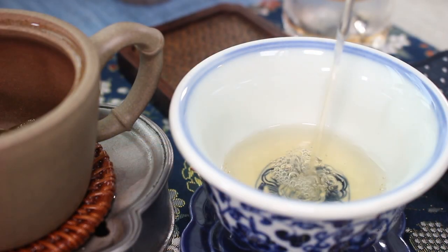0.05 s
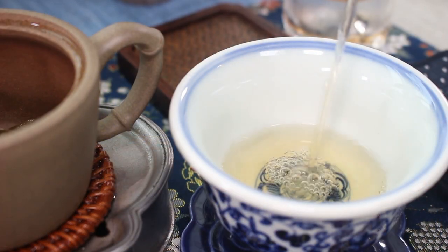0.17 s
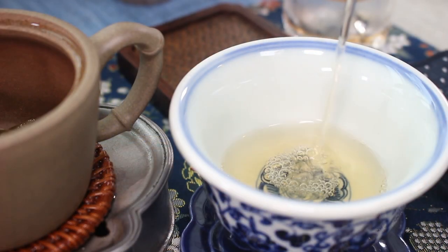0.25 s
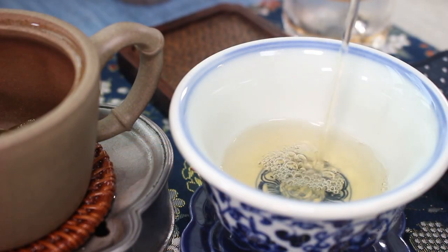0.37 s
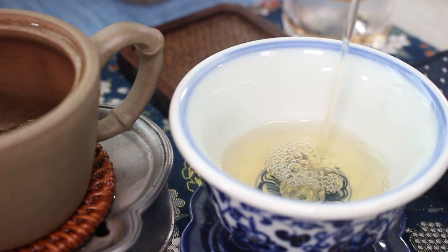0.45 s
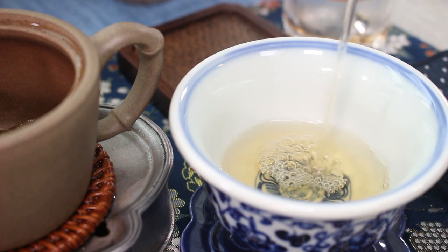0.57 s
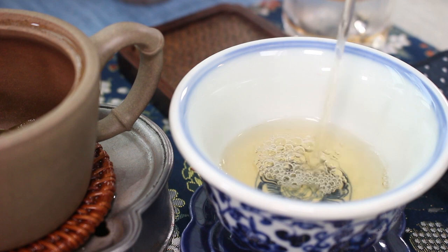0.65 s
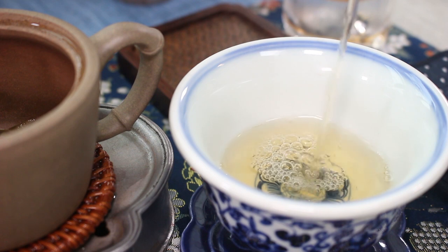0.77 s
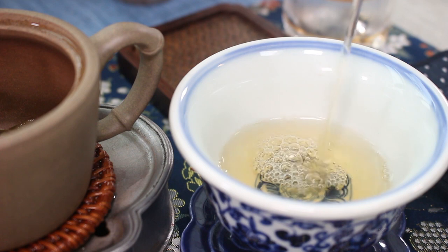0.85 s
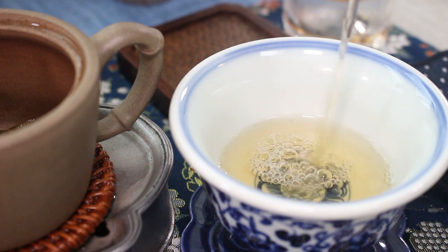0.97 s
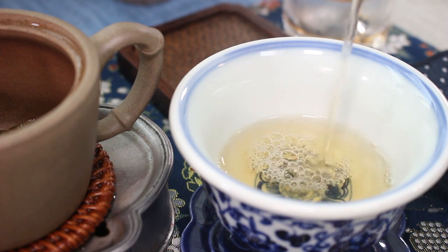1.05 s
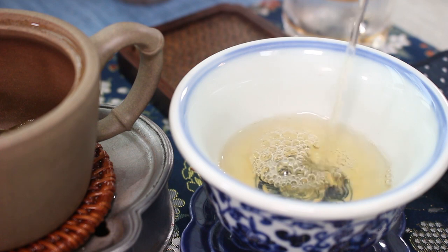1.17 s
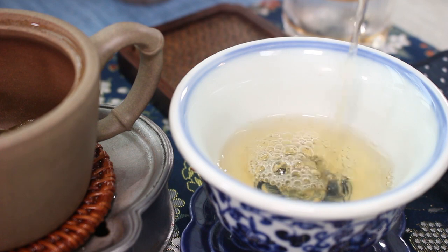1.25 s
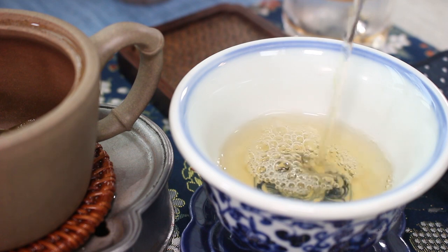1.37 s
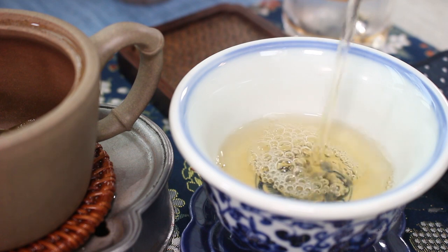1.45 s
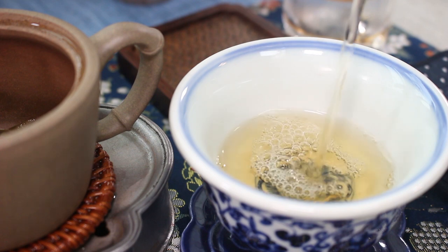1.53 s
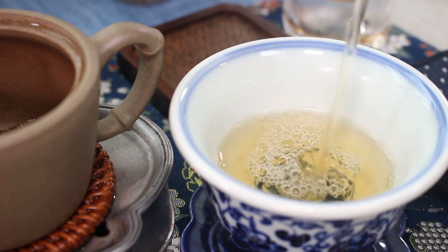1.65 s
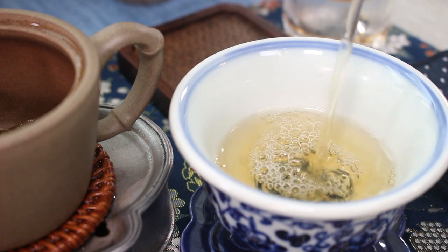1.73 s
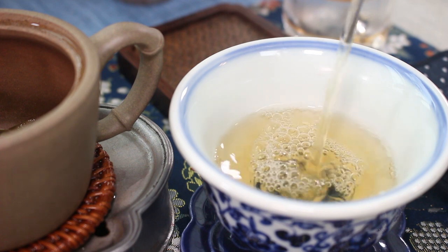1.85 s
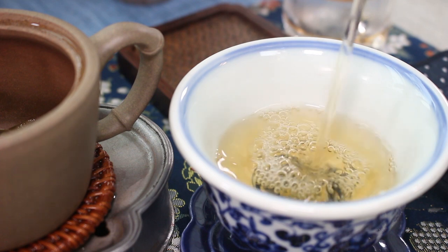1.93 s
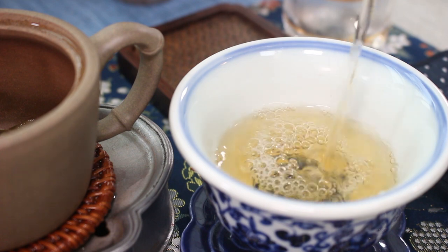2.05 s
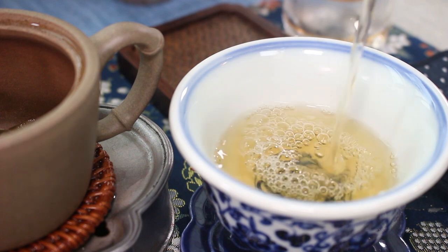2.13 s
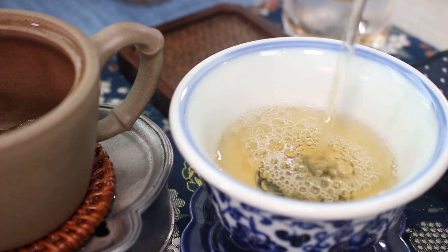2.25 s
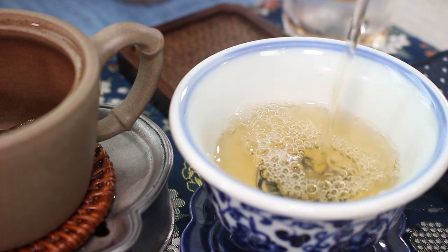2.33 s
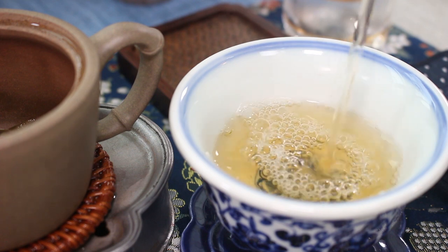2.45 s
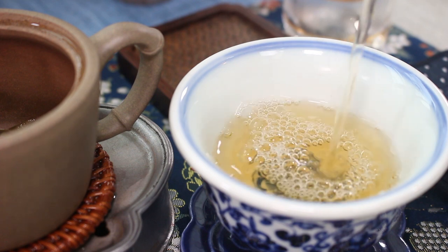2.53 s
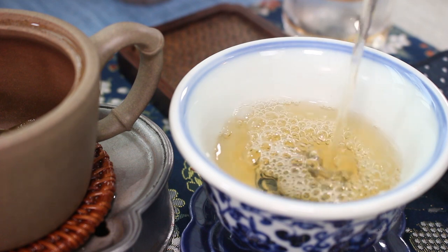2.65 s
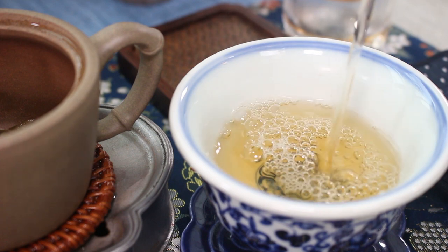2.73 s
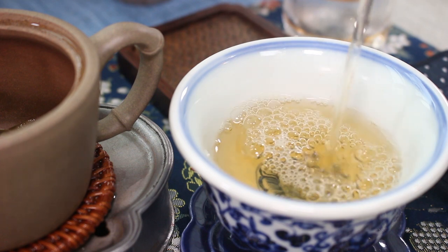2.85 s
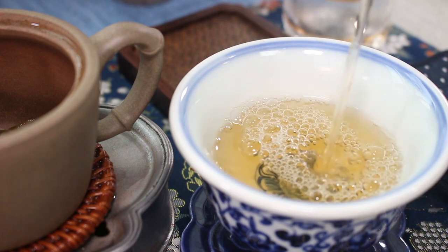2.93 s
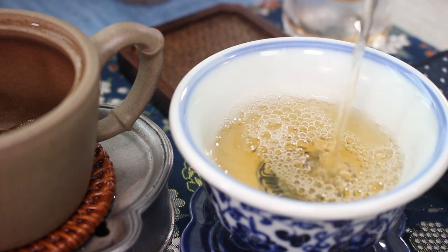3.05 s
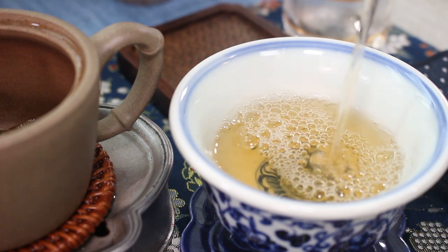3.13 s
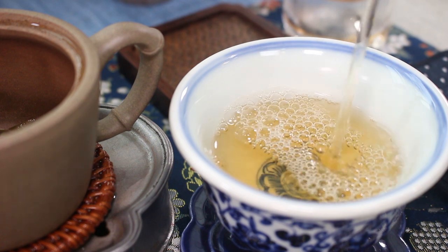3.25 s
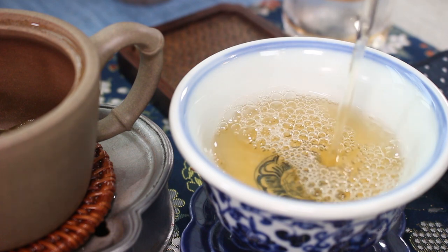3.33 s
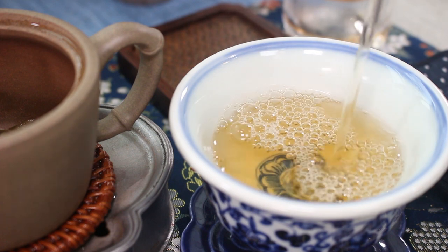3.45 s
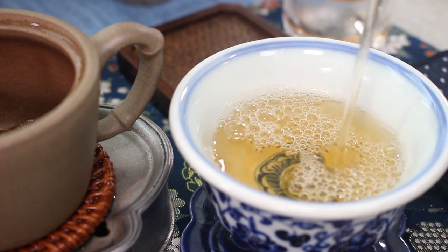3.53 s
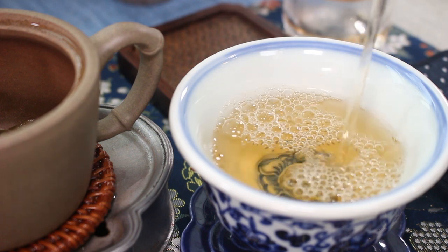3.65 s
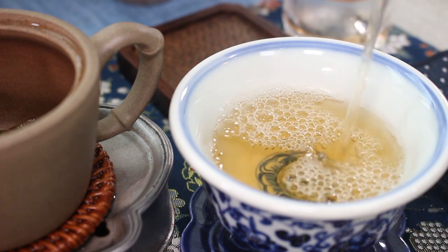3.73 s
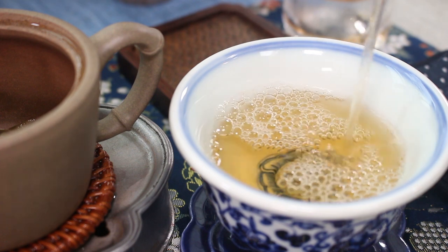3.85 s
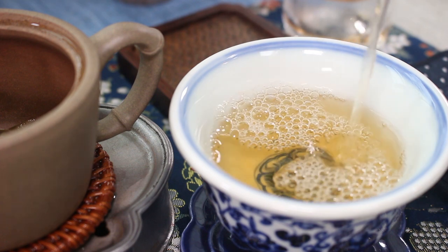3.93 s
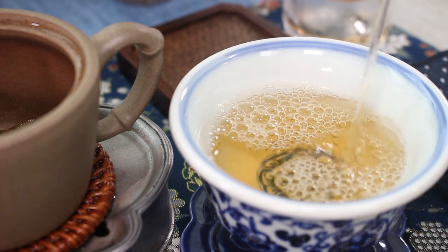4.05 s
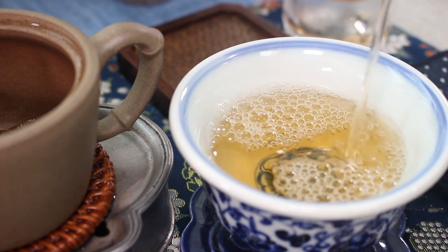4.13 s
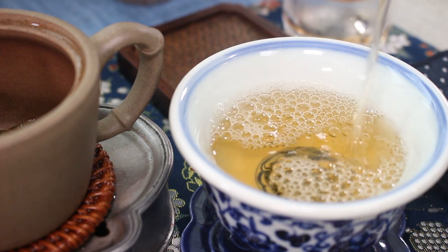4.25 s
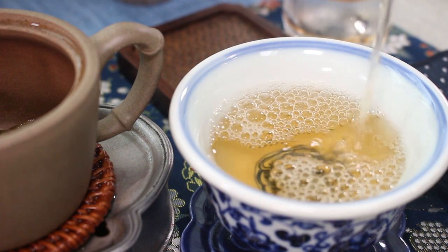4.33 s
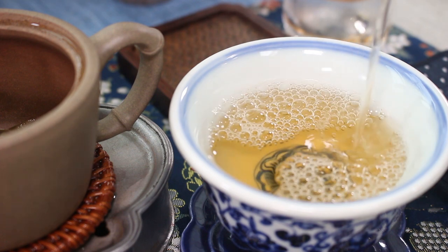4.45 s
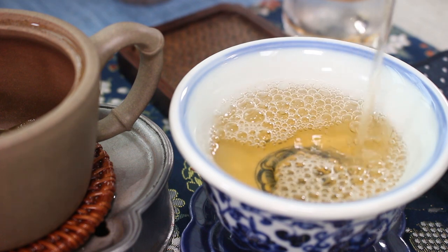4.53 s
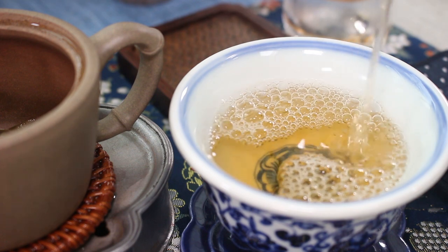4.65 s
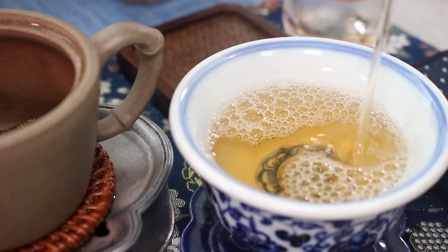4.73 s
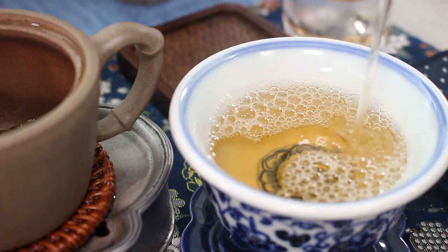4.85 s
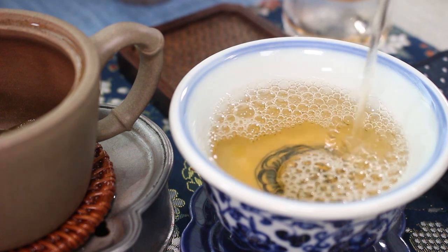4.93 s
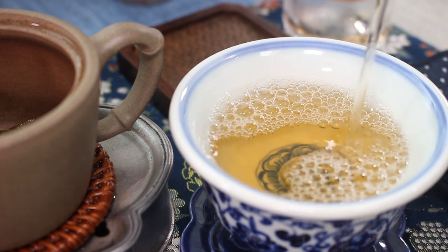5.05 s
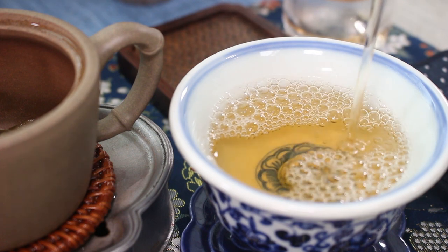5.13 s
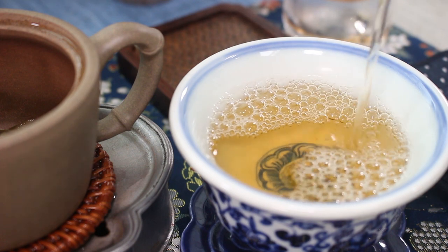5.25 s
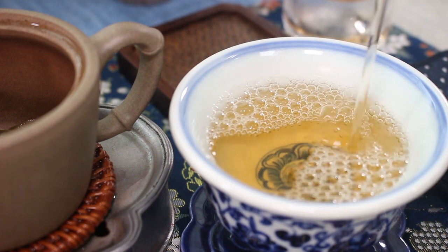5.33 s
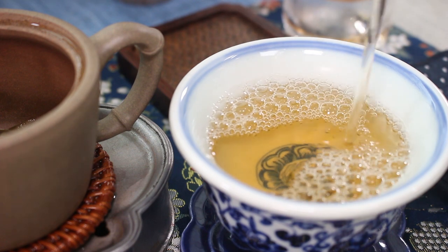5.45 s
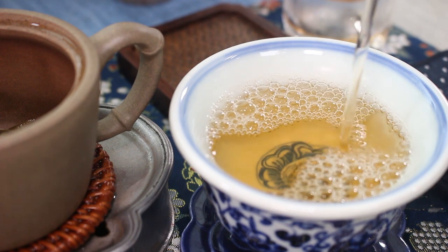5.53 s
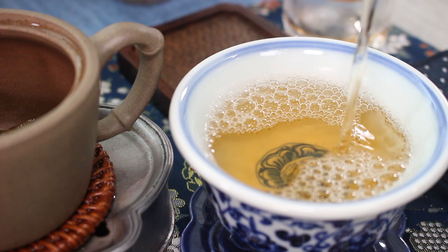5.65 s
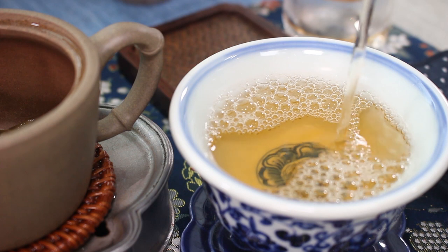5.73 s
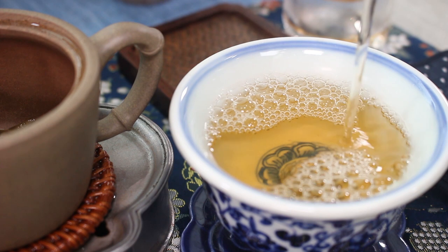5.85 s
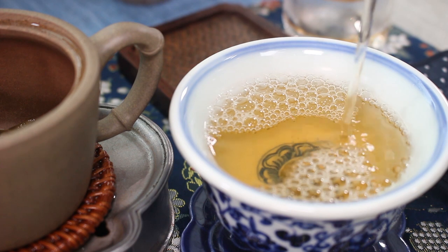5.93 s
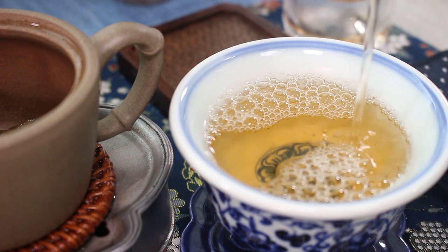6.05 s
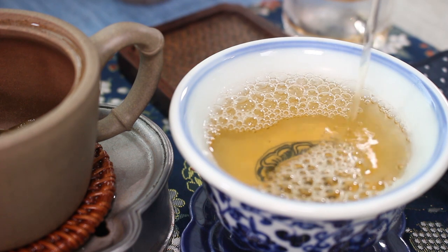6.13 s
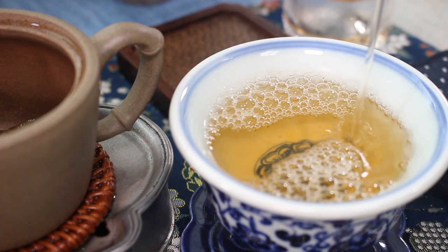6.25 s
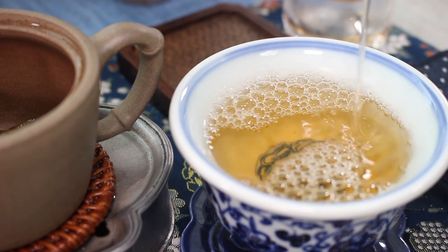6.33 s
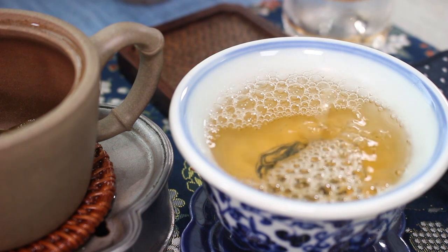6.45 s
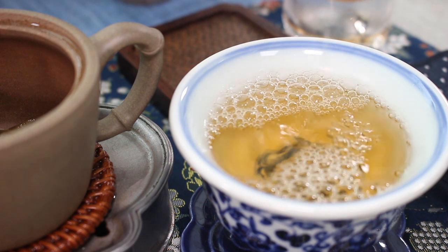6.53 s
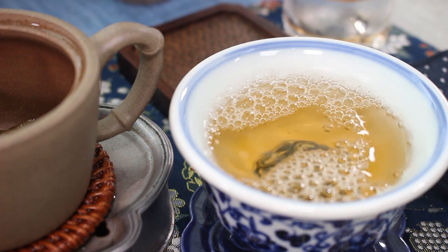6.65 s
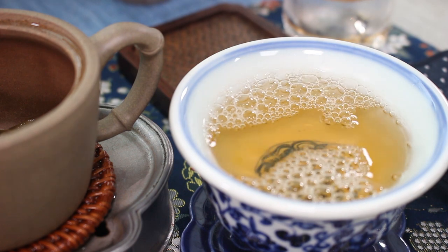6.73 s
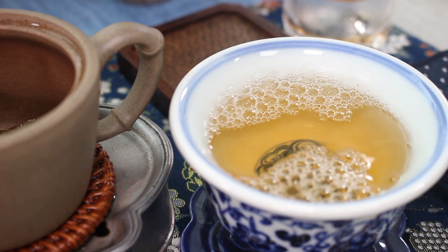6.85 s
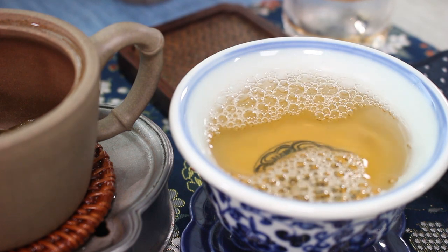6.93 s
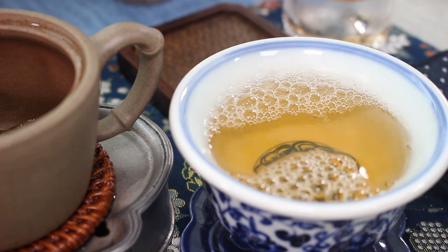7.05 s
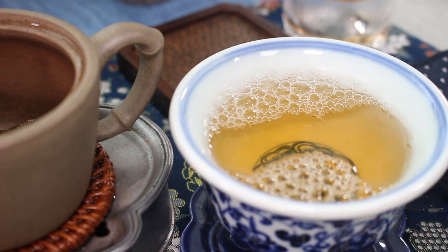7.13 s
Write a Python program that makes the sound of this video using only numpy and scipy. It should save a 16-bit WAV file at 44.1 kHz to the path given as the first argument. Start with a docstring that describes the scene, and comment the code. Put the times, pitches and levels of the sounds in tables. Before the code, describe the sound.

A thin stream of tea pours into a ceramic cup, bubbling and plopping brightly, then thins to a trickle and a few last drips.

```python
"""Tea poured into a cup

A thin stream of tea falls into a ceramic cup on a table, close to a pair of microphone ports.
Each slug of liquid snaps the surface and traps a bubble that rings and rises in pitch. The foam
fizzes, the cup and the table ring briefly, and the stream ends in drips over a quiet room."""
import sys
import numpy as np
from scipy import signal
from scipy.fft import rfft, irfft, next_fast_len
from scipy.io import wavfile
from scipy.ndimage import uniform_filter1d

SR = 44100
rng = np.random.default_rng(int(sys.argv[2]) if len(sys.argv) > 2 else 0)


def put_to_file(sound):
    """Save the sound as 16-bit audio at rate SR, in the file named by the first command-line argument."""
    columns = np.atleast_2d(sound).T  # one column per channel
    safe = np.clip(columns, -1, 1)
    whole_steps = np.round(safe * 32767)
    wavfile.write(sys.argv[1], SR, whole_steps.astype(np.int16))


N = 316638

# single bubbles that stand out of the pour: start_s, level_db, pitch_hz
CLEAR_PLOPS = [(0.0487, -5, 1417), (0.1573, -15.5, 1690), (0.181, -8, 4450), (0.1808, -13.5, 1580),
               (0.186, -11.5, 1550), (0.2041, -17, 1360), (0.215, -5, 1624), (0.3057, -15.5, 1700),
               (0.3532, -10.5, 1700), (0.3589, -9, 1590), (0.3701, -12.5, 1460), (0.5369, -12, 1580),
               (0.54, -14, 1390), (0.5521, -6, 1760), (0.5912, -15, 1270), (0.604, -13.5, 1355),
               (0.625, -10, 4800), (0.6463, -13.5, 1400), (0.669, -4, 3670), (0.7863, -19, 4670),
               (0.7865, -15.5, 2110), (0.8236, -14.5, 1430), (0.8487, -10, 1570), (0.88, -18.5, 3980),
               (0.9175, -17.5, 4120), (0.9372, -20, 1900), (0.952, -11, 1425), (0.9604, -18, 1380),
               (0.992, -17.5, 4770), (1.0058, -14, 1890), (1.026, -13.5, 4760), (1.0563, -17.5, 3760),
               (1.1082, -20, 1410), (1.1293, -21.5, 4270), (1.1302, -16.5, 1700), (1.1542, -14, 4460),
               (1.1762, -20.5, 1360), (1.202, -19.5, 1340), (1.226, -13.5, 1420), (1.3137, -8, 4720),
               (1.3289, -16, 3780), (1.3374, -10.5, 3780), (1.434, -23.5, 1300), (1.5245, -14, 1400),
               (1.5371, -13, 1630), (1.5491, -21.5, 1990), (1.59, -17, 1610), (1.6317, -19, 1410),
               (1.72, -15, 1690), (1.7324, -19, 1380), (1.744, -8.5, 2580), (1.7417, -13.5, 1470),
               (1.762, -20.5, 1470), (1.7845, -16, 1440), (1.902, -21, 2150), (1.911, -20, 1430),
               (1.9179, -17, 1470), (1.939, -22, 1340), (1.9466, -18, 1280), (1.963, -21, 1440),
               (2.0558, -23.5, 1610), (2.118, -13, 1900), (2.1239, -10, 1390), (2.1935, -20, 4700),
               (2.2143, -18, 1320), (2.226, -15, 1290), (2.2273, -11, 3440), (2.2421, -15.5, 2680),
               (2.2619, -10.5, 3900), (2.2836, -12.5, 1230), (2.2974, -17, 2880), (2.3907, -11, 1510),
               (2.4817, -14.5, 1980), (2.5239, -8.5, 3720), (2.5606, -12, 2820), (2.702, -20.5, 4870),
               (2.7281, -16, 1300), (2.7463, -17.5, 3900), (2.809, -19.5, 1650), (2.824, -17, 2920),
               (2.8523, -11.5, 2920), (2.9237, -19.5, 2880), (2.995, -25.5, 1410), (3.0001, -20.5, 2160),
               (3.0005, -14, 3680), (3.0217, -15, 1640), (3.0365, -20, 1390), (3.0412, -16, 2840),
               (3.0435, -18.5, 1400), (3.093, -19.5, 1950), (3.0936, -12.5, 4860), (3.1066, -16.5, 2080),
               (3.1286, -16.5, 4860), (3.1322, -18.5, 2770), (3.1531, -8.5, 2900), (3.2052, -12, 2800),
               (3.222, -11.5, 2800), (3.2453, -15, 2340), (3.276, -21, 1660), (3.3353, -20.5, 4840),
               (3.421, -18.5, 2670), (3.4279, -15, 2020), (3.5459, -16.5, 2860), (3.5759, -19, 2160),
               (3.6063, -17, 2030), (3.6955, -17.5, 5200), (3.7376, -38, 2030), (3.764, -23.5, 2770),
               (3.7772, -25, 2650), (3.822, -19, 1970), (3.8683, -23, 2130), (3.8982, -17, 1960),
               (3.9074, -16.5, 1970), (3.9182, -16.5, 2000), (3.924, -19.5, 2700), (3.9554, -14, 3280),
               (3.9863, -13.5, 1910), (4.0399, -6, 3120), (4.1805, -17, 1770), (4.1936, -14.5, 4040),
               (4.1993, -20, 1750), (4.206, -14, 2680), (4.2485, -25.5, 2820), (4.3397, -6, 3730),
               (4.3704, -24.5, 1390), (4.4242, -16, 3250), (4.4348, -20.5, 1950), (4.453, -23.5, 1440),
               (4.467, -15, 1420), (4.4862, -19, 2840), (4.5226, -18.5, 4950), (4.6007, -19, 2070),
               (4.628, -22, 3350), (4.6354, -18, 2900), (4.6494, -17.5, 1460), (4.67, -21, 1570),
               (4.6838, -18.5, 1720), (4.6904, -20, 1740), (4.7014, -18.5, 2100), (4.7205, -12.5, 2780),
               (4.7486, -13, 4270), (4.7652, -19, 1980), (4.8015, -19.5, 2210), (4.8189, -21.5, 1440),
               (4.9098, -21, 2560), (5.0038, -22.5, 2080), (5.0424, -15, 4440), (5.0707, -9, 3000),
               (5.095, -19, 1470), (5.12, -19, 3280), (5.1694, -22, 2900), (5.2002, -21, 2900),
               (5.219, -16, 4150), (5.2751, -22.5, 2220), (5.306, -25, 2300), (5.3168, -23, 2820),
               (5.322, -33, 3000), (5.329, -27, 1660), (5.343, -34, 1600), (5.3535, -25, 2220),
               (5.4164, -31, 1800), (5.417, -21.5, 3080), (5.4517, -24, 3270), (5.458, -26.5, 3310),
               (5.4948, -41, 1680), (5.5123, -33.5, 1670), (5.6226, -40, 2700), (5.649, -36.5, 2780),
               (5.722, -28, 2960), (5.766, -32, 2970), (5.8084, -33.5, 2140), (5.8434, -32.5, 2730),
               (5.8961, -25, 2610), (5.9942, -35, 2360), (6.0238, -36.5, 2210), (6.1133, -24.5, 2650),
               (6.135, -25, 1700), (6.1353, -28.5, 3100), (6.1978, -26, 3920), (6.2812, -25, 1460),
               (6.31, -13, 3150), (6.3185, -25.5, 1700), (6.377, -28, 1650), (6.3954, -19.5, 3220),
               (6.4029, -20, 2330), (6.4095, -15.5, 2420), (6.418, -23, 1690), (6.4288, -25, 1760),
               (6.5113, -21.5, 2560), (6.513, -22, 1370), (6.5277, -14.5, 2470), (6.529, -22, 1390),
               (6.631, -19.5, 2050)]
# large bubbles gulped deep under the stream: start_s, level_db, nominal_pitch_hz
DEEP_GULPS = [(.1993,-19,1060),(.5897,-18,1020),(.6764,-17.5,946),(.96,-13.5,1036),(.98,-21.5,933),(1.0048,-17,1124),(1.0252,-20,960),(1.2725,-20,890),(1.3216,-18.5,964),(1.5481,-16,1080),(1.5959,-13.5,910),(1.6313,-15,1014),(1.903,-16.5,1010),(2.1172,-13,1195),(2.1501,-19.5,800),(2.1921,-18,880),(2.5217,-18.5,970),(2.581,-23,930),(2.634,-20.5,880),(2.696,-24,817),(2.747,-21.5,870),(2.79,-19,760),(2.8046,-21.5,910),(2.8487,-19,1040),(2.933,-12.5,815),(2.9934,-14,750),(3.023,-20.5,770),(3.0359,-20,900),(3.0585,-16.5,800),(3.0787,-17,796),(3.0929,-18,880),(3.1144,-13,840),(3.1298,-15,910),(3.1509,-15.5,964),(3.3728,-13,880),(3.3919,-21.5,830),(3.4643,-20.5,693),(3.5898,-20.5,885),(3.6129,-15.5,900),(3.7189,-14.5,808),(3.9059,-12.5,758),(3.9548,-19.5,640),(3.9855,-11.5,728),(4.0384,-16.5,750),(4.1207,-15,746),(4.1795,-22.5,795),(4.1997,-15.5,860),(4.3391,-19,784),(4.3702,-7.5,707),(4.3923,-16,888),(4.4854,-18.5,683),(4.6693,-18.5,890),(4.7652,-10,744),(4.7968,-14,622),(4.8192,-22,656),(4.9718,-19,820),(5.072,-18.5,1056),(6.311,-31,1230),(6.346,-31.5,1010),(6.4094,-24.5,945),(6.4291,-24.5,890),(6.458,-35,880),(6.5404,-29.5,1440)]
# the bed of bubbles between the plops: time_s, large_db, small_db, fizz_db
SWARM_LEVELS = [(0.0, -71, -34.5, -48.5), (0.76, -54, -33, -83.5), (1.04, -43, -33.5, -55.5),
                (1.9, -39.5, -33.5, -46.5), (2.1, -32.5, -34.5, -47.5), (2.58, -34.5, -33.5, -46),
                (3.0, -29, -31.5, -47.5), (3.38, -37, -31.5, -50.5), (3.6, -31, -35, -40.5),
                (4.08, -30.5, -32.5, -47.5), (4.5, -33.5, -32, -56), (4.88, -33.5, -35.5, -46.5),
                (5.1, -43.5, -31.5, -55.5), (5.5, -45, -40.5, -58.5), (5.6, -56, -49, -60),
                (5.9, -61, -45.5, -77), (6.101, -88.5, -58.5, -99), (6.44, -88.5, -32.5, -89),
                (6.66, -62, -59.5, -58), (7.18, -76.5, -108, -75)]
SWARM_S, LARGE_DB, SMALL_DB, FIZZ_DB = np.transpose(SWARM_LEVELS)
# small bubbles, which shrink while the stream is a trickle: time_s, lowest_hz, range_octaves
SMALL_SIZES = [(0, 1172, 2.37), (5.2, 1406, 1.44), (5.6, 1800, 0.95), (6.199, 1905, 0.72), (6.3, 1037, 2.9)]
# foam bubbles, finer once the stream weakens: time_s, lowest_hz, range_octaves
FOAM_SIZES = [(4.901, 2707, 2.3), (5.3, 6000, 1.5)]


def plops():
    """A slug traps a short bubble and a faint companion; the surface tears harder under loud ones."""
    out = np.zeros(N)
    for (s, db, hz), (late, pitch, ring) in zip(CLEAR_PLOPS, rng.random((len(CLEAR_PLOPS), 3))):
        trickle = 5.1 < s < 6.1  # bubbles form gently: slower start, longer ring, less tearing
        onset_cycles, stretch, tear_db = (0.95, 1.37, -24) if trickle else (0.52, 1, -6)
        cycles = (13 + 12 * ring) * stretch
        add(out, s, gain_of(db) * bubble(hz, cycles / hz, rise=0.008, onset_cycles=onset_cycles))
        companion = bubble(hz * 2 ** (1.3 * pitch - .5), 0.011, rise=0.25, onset_cycles=1.0)
        add(out, s + 0.01 * late, gain_of(db - 14) * companion)
        add(out, s, gain_of(tear_db + 1.03 * db) * tear(2 * hz, 0.0072))
    return out


def gulps():
    """A large bubble rings long; two short tones above and below it give the blunt opening thump."""
    out = np.zeros(N)
    for s, db, hz in DEEP_GULPS:
        add(out, s, gain_of(db + 4) * bubble(0.9376 * hz, 26 / hz, rise=0.26, onset_cycles=0.19))
        add(out, s, gain_of(db - 9.5) * bubble(1.7 * hz, 5 / hz, rise=0.12, onset_cycles=0.21))
        add(out, s, gain_of(db - 11.5) * bubble(0.73 * hz, 6 / hz, rise=0.1, onset_cycles=0.067))
    return out


def pops():
    """The film cracks, a tiny bubble rings and spray sizzles."""
    # splashes and foam bursting at the surface: start_s, level_db, pitch_hz, spray_db
    bursts = [(0.0387, -22.0, 6010, -72), (0.217, -23.5, 10400, -16.5), (0.3537, -16, 5860, -43),
              (0.3607, -33, 6190, -54), (0.552, -20.5, 6260, -22), (0.6037, -25.5, 5440, -21),
              (0.6525, -37, 9000, -34), (0.6688, -20.5, 5700, -25.5), (0.6783, -24.5, 6850, -46),
              (0.8363, -63, 9100, -29), (0.88, -26, 5250, -73), (0.95, -61, 9000, -29),
              (1.005, -22, 5570, -21.5), (1.0261, -25, 7100, -59), (1.1294, -24, 5900, -50),
              (1.2246, -43, 8900, -24.5), (1.3123, -47, 5530, -47), (1.3365, -33, 9300, -27.5),
              (1.533, -38, 9000, -29), (1.5491, -51, 9000, -29.5), (1.5693, -58, 9000, -35),
              (1.5872, -26, 8800, -29.5), (1.6496, -29, 8810, -43), (1.7334, -46, 9200, -26.5),
              (1.7456, -24.5, 8340, -49), (1.8968, -25.5, 9230, -32), (1.9177, -24, 8490, -44),
              (1.9626, -28, 9050, -21.5), (2.0565, -20.5, 8490, -49), (2.102, -27, 8600, -55),
              (2.1177, -18, 8360, -34), (2.1256, -18.5, 6170, -32), (2.151, -21.5, 8700, -43),
              (2.1927, -24, 5460, -51), (2.2376, -31, 9400, -28), (2.39, -21, 6870, -26),
              (2.4283, -25.5, 8760, -23), (2.4352, -53, 9100, -45), (2.5223, -25, 7800, -24),
              (2.747, -22, 5930, -36), (2.7888, -19, 8700, -40), (2.861, -24.5, 9000, -29),
              (3.092, -31.5, 5500, -52), (3.106, -23, 8300, -33), (3.6073, -24, 9350, -40),
              (3.6797, -19.5, 7800, -44), (3.7105, -23.5, 6900, -44), (3.7378, -36, 5500, -27),
              (3.8413, -25, 9900, -39), (3.8817, -17, 7160, -59.5), (3.9542, -26, 9100, -50),
              (4.0029, -32, 9000, -27), (4.04, -34, 7150, -42), (4.0741, -23, 7000, -54),
              (4.25, -21, 6400, -57), (4.3083, -29, 7610, -53.5), (4.3392, -21, 7200, -20.5),
              (4.364, -22, 8820, -38), (4.3881, -32, 5430, -31.5), (4.6905, -33.5, 9200, -29.5),
              (4.766, -28.5, 8050, -45), (4.8191, -25, 7040, -28), (5.0034, -22.5, 9050, -29),
              (5.404, -31.5, 8800, -55), (5.8876, -37, 8850, -39), (6.1506, -36.5, 7300, -70),
              (6.197, -28.5, 6660, -71), (6.3097, -31, 5570, -68), (6.3471, -19.5, 7500, -26),
              (6.3567, -34, 8200, -45), (6.403, -23, 8900, -22), (6.4096, -20.5, 8500, -37),
              (6.43, -30, 5570, -31), (6.46, -24, 8600, -37), (6.4866, -33, 8750, -33),
              (6.5113, -43, 9080, -39), (6.6714, -41, 8700, -64), (6.767, -44, 9000, -45),
              (6.8224, -39.5, 9120, -52), (6.8627, -58, 9000, -42), (6.885, -48, 5800, -46),
              (6.952, -43, 8500, -65), (7.005, -42.5, 7300, -60), (7.017, -46, 7500, -57),
              (7.104, -47, 8500, -65)]
    out = np.zeros(N)
    for s, db, hz, spray_db in bursts:
        add(out, s, gain_of(db + 7) * bubble(hz, 24 / hz, rise=0.051, onset_cycles=0.17))
        add(out, s, gain_of(db - 6) * tear(hz, 0.0086))
        add(out, s, gain_of(spray_db + 21.5) * tear(17000, 0.008))
        add(out, s, gain_of(db - 10) * tear(0.65 * hz, 0.016))
    return out


def slaps():
    """A sudden push of pressure and its rebound, heard as a crack over the whole band."""
    # slugs landing hard on the surface: start_s, level_db
    hits = [(0.18, -20), (0.2159, -8), (0.5377, -12), (0.5717, -20), (0.59, -16.0), (0.605, -13),
            (0.6467, -13.5), (0.6691, -2), (1.0052, -3), (1.632, -10), (2.1178, -2), (2.1925, -13.9),
            (2.2277, -12), (2.391, -11), (2.5233, -12.6), (3.5465, -16), (3.9864, -7), (4.0402, -11),
            (4.34, -6), (4.3709, -8), (4.7659, -6), (4.91, -19.5), (5.072, -18), (6.2822, -17.5),
            (6.4035, -16.0), (6.41, -7), (6.4296, -14), (6.4391, -19)]
    rise_s, collapse_s = .000015, .00007
    out, t = np.zeros(N), np.arange(200) / SR
    push = (1 - t / collapse_s) * np.exp(-t / collapse_s) * (1 - np.exp(-t / rise_s))
    for s, db in hits:
        add(out, s, -gain_of(db) * push / push.max())
    return out


def droplets():
    """A droplet on a calm surface leaves a soft bubble that rings long."""
    # lone drips of the dying stream: start_s, level_db, pitch_hz
    drips = [(6.019, -43.5, 4180), (6.063, -43, 4500), (6.192, -39, 5100), (6.2334, -32.5, 2130),
             (7.127, -57, 2040)]
    out = np.zeros(N)
    for s, db, hz in drips:
        add(out, s, gain_of(db) * bubble(hz, 0.021, rise=0.021, onset_cycles=1.1))
    return out


def stream_slugs(per_s):
    """The stream lands as unequal, roughly evenly spaced slugs: start_s, level_db."""
    slugs = rng.random((2000, 2))[:int(per_s * N / SR)] * [1.4 / per_s, 6]
    slugs[:, 0] += np.arange(len(slugs)) / per_s
    return slugs


def large_bubbles(slugs):
    """Their pitch drops as the tea deepens, until the stream weakens and no longer dives."""
    start_hz, sink_hz_per_s, deepest_s, shallow_hz, octaves = 859, 48.4, 4.62, 840, 0.36
    deepest_hz = start_hz - sink_hz_per_s * deepest_s
    sizes = [(0, start_hz, octaves), (deepest_s, deepest_hz, octaves), (N / SR, shallow_hz, octaves)]
    bubbles = swarm(LARGE_DB, sizes, slugs, per_s=400, cycles=14.7, spread_db=4.5)
    return churn(CLEAR_PLOPS, settle_s=0.039, depth=0.23) * bubbles


def small_bubbles(slugs):
    """A dense, bright babble that flares for an instant at each plop."""
    bubbles = swarm(SMALL_DB, SMALL_SIZES, slugs, per_s=620, cycles=26.9, spread_db=5.5,
                    low_bias=1.493, onset_cycles=0.7)
    return churn(CLEAR_PLOPS, settle_s=0.0019, depth=0.18) * bubbles


def foam(slugs):
    """Fine bubbles fizz and spray ticks on the surface."""
    fizz = swarm(FIZZ_DB, FOAM_SIZES, slugs, per_s=900, cycles=42, spread_db=6)
    ticks = swarm(FIZZ_DB, FOAM_SIZES, slugs, per_s=340, cycles=4.7, spread_db=10)
    fizz *= churn(CLEAR_PLOPS, settle_s=0.029, depth=0.14)
    ticks *= churn(CLEAR_PLOPS, settle_s=0.094, depth=0.25)
    return fizz + ticks


def slosh(slugs):
    """A low slosh under the bubbles, stirred by each gulp."""
    # it deepens as the cup fills: time_s, lowest_hz, range_octaves
    sizes = [(2.6, 417, .5), (4.4, 291, .9)]
    bubbles = swarm(LARGE_DB - 11.5, sizes, slugs, per_s=200, cycles=8, spread_db=4.5)
    return churn(DEEP_GULPS, settle_s=0.015, depth=0.83) * bubbles


def taps(slugs):
    """Slugs tap the surface, each tap only a few cycles long."""
    # the taps die away as the stream thins: time_s, offset_db
    fade = [(4.8, -8), (5.2, -22)]
    level_db = SMALL_DB + np.interp(SWARM_S, *np.transpose(fade))
    return swarm(level_db, SMALL_SIZES, slugs, per_s=250, cycles=4.4, spread_db=10)


def swarm(level_db, sizes, slugs, per_s, cycles, spread_db, low_bias=0.83, onset_cycles=0.38):
    """Bubbles of random size, shed within a moment of each slug, a few louder than the rest."""
    out, spatter_s = np.zeros(N), .004
    size_s, lowest_hz, octaves = np.transpose(sizes)
    for pick, late, pitch, ring, strength in rng.random((9000, 5))[:int(per_s * N / SR)]:
        slug_s, slug_db = slugs[int(pick * len(slugs))]
        s = slug_s - spatter_s * np.log(1 - late)
        octaves_up = np.interp(s, size_s, octaves) * pitch ** low_bias
        hz = np.interp(s, size_s, lowest_hz) * 2 ** octaves_up
        db = slug_db + spread_db * min(-np.log(1 - strength), 2.6)
        t60 = cycles * (.5 + ring) / hz
        add(out, s, gain_of(db) * bubble(hz, t60, rise=0.23, onset_cycles=onset_cycles))
    return out / out.std() * lulls() * gain_of(np.interp(np.arange(N) / SR, SWARM_S, level_db))


def churn(events, settle_s, depth):
    """Each event stirs the surface, which then settles; a gain around 1."""
    kicks = np.zeros(N)
    for s, db, _ in events:
        kicks[round(s * SR)] += gain_of(db)
    stir = signal.lfilter([1], [1, -np.exp(-1 / (settle_s * SR))], kicks) + 1e-5
    return (0.0067 + stir / uniform_filter1d(stir, SR // 4)) ** depth


def lulls():
    """A gain that sinks smoothly wherever the stream breaks."""
    # breaks in the stream: middle_s, length_s, dip_db
    breaks = [(0.102, 0.036, -26), (0.278, 0.075, -4), (0.492, 0.034, -2), (0.724, 0.086, -6.5),
              (1.685, 0.032, -26), (2.012, 0.02, -8), (2.363, 0.03, -18), (2.694, 0.046, -25),
              (4.528, 0.026, -11.5), (5.565, 0.048, -15), (6.08, 0.055, -28), (6.26, 0.017, -25.5),
              (6.601, 0.024, -15.5)]
    t = np.arange(N) / SR
    return gain_of(sum(db * np.exp(-(2 * (t - s) / length) ** 2) for s, length, db in breaks))


def bubble(hz, t60, rise, onset_cycles):
    """A damped sine of peak 1 whose pitch climbs as the bubble nears the surface."""
    t = np.arange(int(t60 * SR) + 32) / SR
    onset = (1 - np.exp(-t * hz / onset_cycles)) ** 2
    ring = np.sin(2 * np.pi * hz * t * (1 + rise * t / t60)) * gain_of(-60 * t / t60) * onset
    return ring / abs(ring).max()


def tear(hz, t60):
    """A crack of noise around hz as a film of liquid tears."""
    t = np.arange(2400) / SR
    band = signal.butter(2, [.6 * hz, min(1.7 * hz, .45 * SR)], "band", fs=SR)
    crack = signal.lfilter(*band, rng.standard_normal(len(t)))
    return crack / crack.std() / 2 * gain_of(-60 * t / t60) * (1 - np.exp(-t / 0.0012))


def cup(liquid):
    """The cup and the air in it ring briefly after each sound."""
    # resonances: pitch_hz, width_hz, level_db
    modes = [(680, 40, -3), (770, 60, -1), (930, 55, -2), (1272, 40, -2), (1405, 70, -2), (1654, 45, -1),
             (1947, 55, -3), (2930, 80, -3)]
    t = np.arange(3000) / SR
    ring = np.zeros(len(t))
    for hz, width_hz, db in modes:
        decay = 2 * np.pi * width_hz / SR * np.exp(-np.pi * width_hz * t)
        ring += gain_of(db) * decay * np.sin(2 * np.pi * hz * t)
    return liquid + gain_of(-30) * signal.oaconvolve(liquid, ring)[:N]


def path_to_microphone(sound):
    """The short way from cup to microphone colours the sound, with dips from the table echo."""
    # response of the path: frequency_hz, gain_db
    colour = [(200, -21), (300, -20), (450, -11.5), (900, -4.5), (1010, -5.5), (1150, -8), (1260, 1),
              (1380, 3.5), (1530, -1.5), (1700, 3.5), (3000, 5), (5700, 1), (9000, 5), (12000, 1),
              (14500, -17), (16000, -14)]
    log_gain = np.log(gain_of(curve_at(colour, abs(np.fft.fftfreq(4096, 1 / SR)))))
    impulse = np.fft.ifft(np.exp(signal.hilbert(log_gain).conj())).real[:2048]  # minimum phase
    return signal.oaconvolve(sound, impulse)[:N]


def ports(sound):
    """The two microphone ports hear one source, each with its own delay and shading."""
    # phase between the ports: frequency_hz, left_lead_rad
    lead = [(0, 0), (2670, 0.8), (4050, 2.2), (5000, 1.3), (6630, 2.9), (7580, 2.3), (11300, 3.0),
            (15800, 6.8)]
    # shading between the ports: frequency_hz, left_minus_right_db
    shading = [(60, 17.5), (150, 8), (380, 1), (950, -2), (2380, 0), (5980, 7.5), (15000, 3.5)]
    size = next_fast_len(N + 4096)
    hz = np.fft.rfftfreq(size, 1 / SR)
    left = gain_of(curve_at(shading, hz) / 2) * np.exp(.5j * np.interp(hz, *np.transpose(lead)))
    return irfft(rfft(sound, size) * np.array([left, 1 / left]), size)[:, :N]


def reflections(sound):
    """Sparse echoes, each band dying at its own speed; three tails take turns so no pitch rings on."""
    # decay of the near reflections: frequency_hz, t60_s
    decay = [(400, 0.37), (1500, 0.11), (4000, 0.079), (12000, 0.075)]
    echoes = np.zeros((9, 12000))
    arrivals = np.arange(60, 11960, 20) + rng.integers(0, 20, (9, 595))
    np.put_along_axis(echoes, arrivals, rng.choice([-1., 1.], arrivals.shape), 1)
    hz, t, spectra = signal.stft(echoes, SR, nperseg=128)
    tails = signal.istft(spectra * gain_of(-60 * t / curve_at(decay, hz)[:, None]), SR, nperseg=128)[1]
    tails = tails.reshape(3, 3, -1) / np.linalg.norm(tails[0])  # each turn: shared, left, right
    turns = np.sqrt(2 / 3) * np.cos(2 * np.pi * (np.arange(N) / SR + np.arange(3)[:, None] / 3))
    wet = signal.oaconvolve((sound * turns)[:, None], tails, axes=2).sum(0)[:, :N]
    scattered = signal.lfilter([1, -.6], [1], wet[1:])  # mainly the treble scatters apart
    return gain_of(-10) * ports(wet[0]) + gain_of(-6.5) * scattered


def room():
    """Room tone: a low rumble that swells and a faint hiss, a little louder on the left."""
    # steady noise spectrum: frequency_hz, relative_db
    colour = [(15, -25), (30, -5), (44, 0), (55, 5), (70, 1), (105, -2), (200, -16), (700, -23),
              (1230, -22), (2400, -31), (4500, -30), (9300, -29), (16000, -38)]
    # likeness of left and right: frequency_hz, correlation
    likeness = [(30, .65), (200, .65), (1000, .3), (8000, .1)]
    # swells of the rumble: time_s, relative_db
    swells = [(0.0, -59), (1.401, -59.5), (1.62, -51), (1.849, -58.5), (3.92, -56), (4.14, -60.5),
              (5.72, -57), (7.18, -61)]
    frames, hz = N // 512 + 5, np.fft.rfftfreq(2048, 1 / SR)
    a, b, c, d = rng.standard_normal((frames, 1025, 4)).T
    correlation = np.clip(curve_at(likeness, hz), -1, 1)[:, None]
    left = a + 1j * b
    right = correlation * left + np.sqrt(1 - correlation ** 2) * (c + 1j * d)
    spectra = np.array([left, right]) * gain_of(curve_at(colour, hz))[:, None]
    swell_db = np.interp(np.arange(frames) * 512 / SR, *np.transpose(swells))
    spectra *= gain_of(np.outer(hz < 220, swell_db - swell_db.mean()))
    noise = signal.istft(spectra, nperseg=2048, noverlap=1536)[1][:, :N]
    return gain_of([[-56], [-59]]) * noise / noise.std()


def gain_of(db):
    """Decibels to gain."""
    return 10 ** (np.asarray(db) / 20)


def curve_at(points, hz):
    """Reads a table on a log-frequency axis."""
    point_hz, value = np.transpose(points)
    return np.interp(np.log(hz + 1), np.log(point_hz + 1), value)


def add(mix, start_s, sound):
    """Mixes a sound in from start_s."""
    part = mix[round(start_s * SR):][:len(sound)]
    part += sound[:len(part)]


def scene():
    """The pour rings in the cup and reaches the close ports with its reflections, over room tone."""
    slugs = stream_slugs(per_s=120)
    liquid = plops() + gulps() + pops() + droplets() + slaps()
    liquid += large_bubbles(slugs) + small_bubbles(slugs) + foam(slugs) + slosh(slugs) + taps(slugs)
    near = path_to_microphone(cup(liquid))
    return ports(near) + reflections(near) + room()


def record(dry):
    """The recorder clips any overload at full scale and cuts off above 16.3 kHz."""
    lowpass = signal.firwin(511, 16300, window=("kaiser", 9), fs=SR)
    return signal.oaconvolve(np.clip(dry, -1, 1), lowpass[None], "same")


dry = scene()
out = record(dry)
put_to_file(out)
```